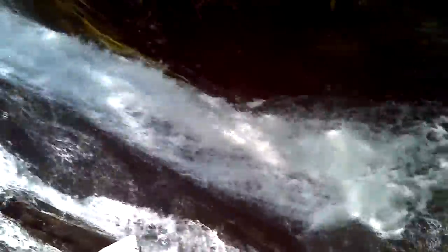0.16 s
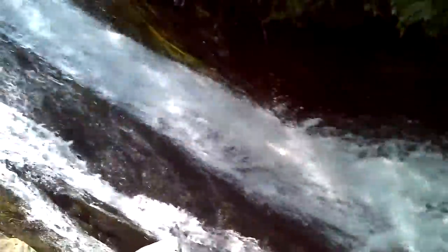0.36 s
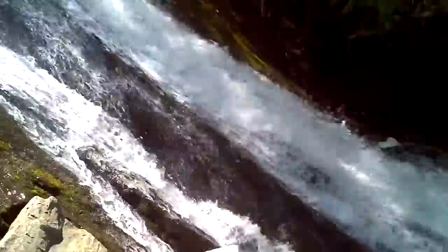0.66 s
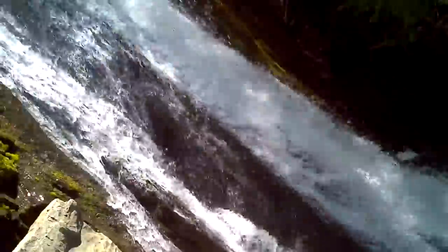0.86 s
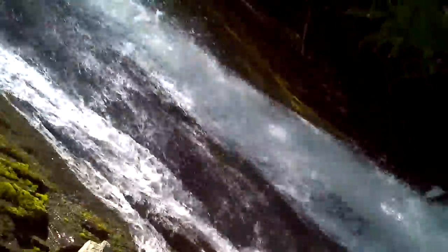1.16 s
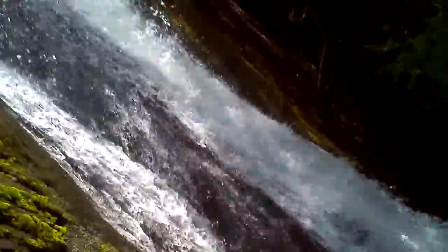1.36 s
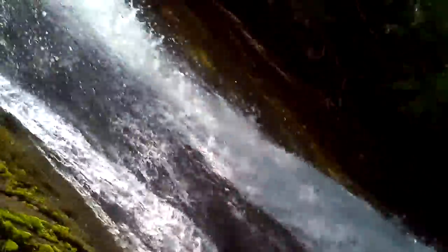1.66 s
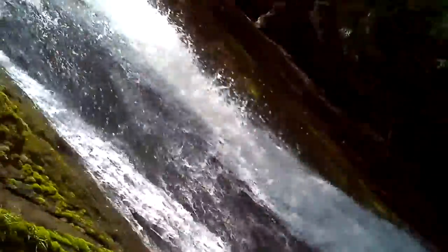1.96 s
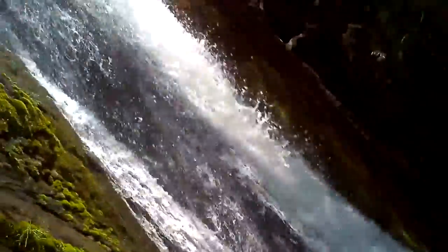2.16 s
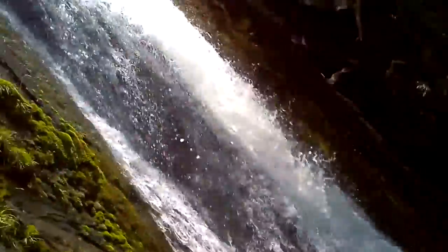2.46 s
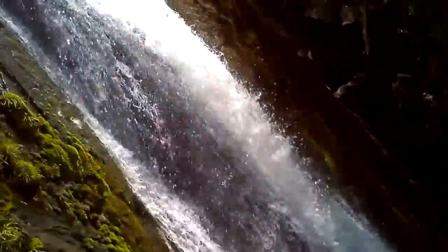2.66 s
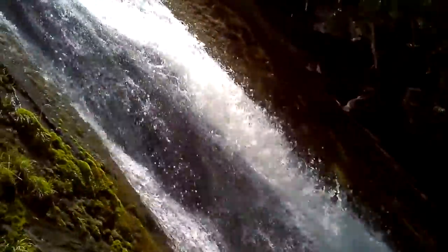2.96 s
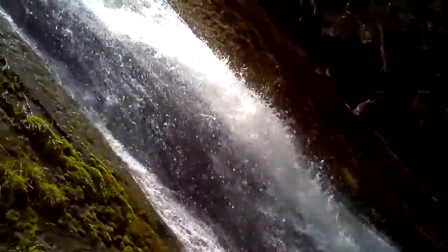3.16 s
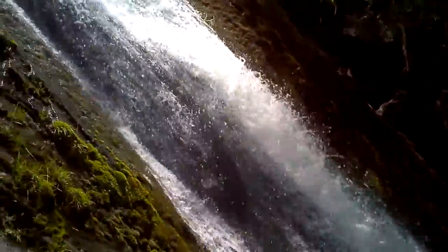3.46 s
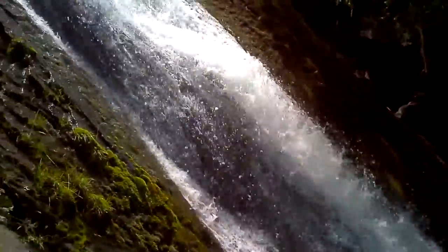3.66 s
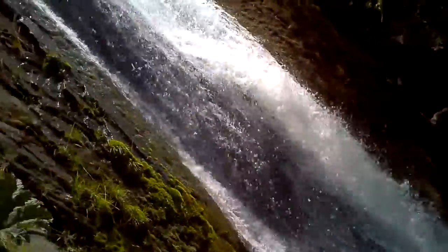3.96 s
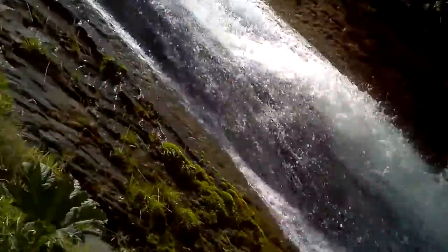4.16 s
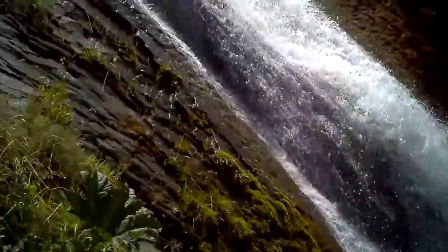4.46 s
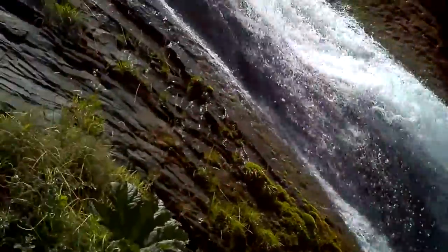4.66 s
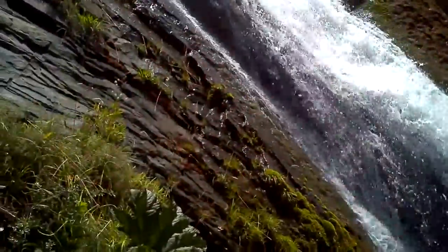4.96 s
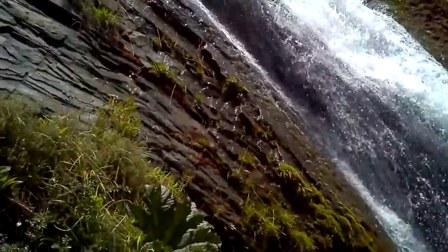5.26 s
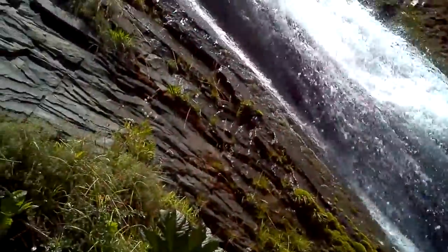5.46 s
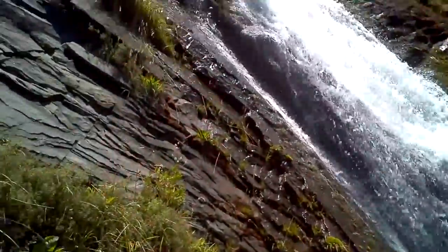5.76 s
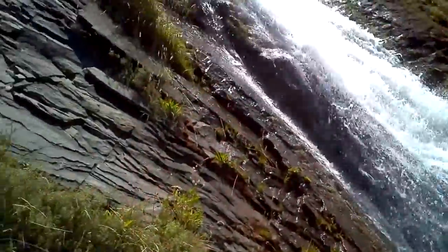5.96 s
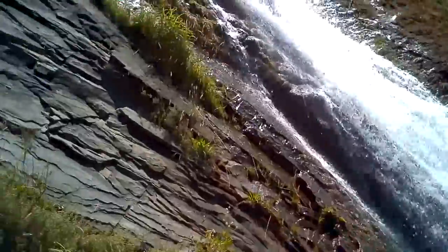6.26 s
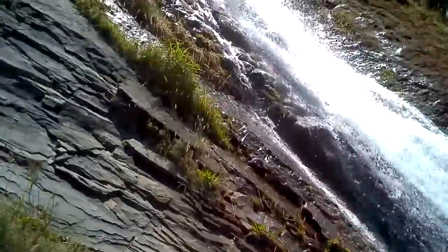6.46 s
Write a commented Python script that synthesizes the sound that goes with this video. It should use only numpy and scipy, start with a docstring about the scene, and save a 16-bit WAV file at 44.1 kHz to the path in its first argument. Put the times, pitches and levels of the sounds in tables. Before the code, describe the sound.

Steady, bright roar of white water racing over stone, with pattering droplets, wet slaps, and light wind-like thumps at the start.

```python
"""Waterfall on rock slabs.

A waterfall close by, as shaped noise and damped rings: the pool churns, a chute gargles, the sheet rushes
with bursting bubbles, spray hisses and patters, slaps hit the stone and air pockets gulp. Its draught
puffs on two microphone ports, as low noise under swells. The camera widens the ports into stereo by
cross-subtraction. Twice the sound cuts out for an instant."""
import sys
import numpy as np
from scipy import signal
from scipy.fft import rfft, irfft, next_fast_len
from scipy.io import wavfile
from scipy.ndimage import uniform_filter1d, map_coordinates

SR = 44100
rng = np.random.default_rng(int(sys.argv[2]) if len(sys.argv) > 2 else 0)


def output_pcm(signal):
    """Save a mono or channel-first signal as 16-bit PCM at the path in sys.argv[1].

    Samples are clipped to [-1, 1] before scaling.
    """
    pcm = np.clip(np.atleast_2d(signal).T, -1, 1) * 32767
    wavfile.write(sys.argv[1], SR, np.round(pcm).astype(np.int16))


N = 291501

# spectrum shape of droplets on rock: hz, relative_db_per_hz
SPRAY_SPECTRUM = [(3000, -30.5), (5200, -17.5), (6000, -6), (6550, 0.15), (7400, -0.5), (8200, 0.5),
                  (8900, 0.5), (9600, -4.5), (10400, -5), (11000, -8.5)]


def amp(db):
    """Decibels to gain."""
    return 10 ** (np.asarray(db) / 20)


def unit(x):
    """Scale to rms 1."""
    return x / np.sqrt(np.mean(x ** 2) + 1e-20)


def along(points, hz):
    """Read (Hz, value) points on a log frequency axis."""
    point_hz, value = np.transpose(points)
    return np.interp(np.log(hz + 1), np.log(point_hz + 1), value)


def curves(rows):
    """One value per sample for each column after the time."""
    time_s, *columns = np.transpose(rows)
    return [np.interp(np.arange(N) / SR, time_s, column) for column in columns]


def wobble(knots_per_s):
    """Smooth random curve through normally distributed knots."""
    knots = rng.standard_normal(2048)
    return map_coordinates(knots, [np.arange(N) * knots_per_s / SR], mode="wrap")


def hump(centre_s, length_s):
    """Smooth swell of height 1, half as high at the ends of its length."""
    offset_s = np.arange(N) / SR - centre_s
    return np.exp(-np.log(2) * (2 * offset_s / length_s) ** 2)


def filtered(x, response):
    """Multiply the spectrum of x by a response of frequency."""
    size = next_fast_len(N + 8192)
    hz = np.fft.rfftfreq(size, 1 / SR)
    return irfft(rfft(x, size) * response(hz), size)[..., :N]


def churn(patchy_db):
    """Two unrelated noises whose loudness shifts in common patches of time and pitch."""
    spectra = signal.stft(rng.standard_normal((2, N)), nperseg=512)[2]
    field = rng.standard_normal(spectra.shape[1:])
    field = uniform_filter1d(field, size=6, axis=0)  # bins
    field = uniform_filter1d(field, size=12, axis=1)  # frames
    patchy = spectra * amp(patchy_db * unit(field))
    return unit(signal.istft(patchy, nperseg=512)[1][:, :N])


def grains(count, low_hz, high_hz, decay_cycles, spread_db, rise, ring_samples):
    """Two unrelated showers of damped rings, climbing in pitch for two decay times like surfacing bubbles."""
    when, pitch, strength, lane = rng.random((count, 4)).T[:, :, None]
    hz = low_hz * (high_hz / low_hz) ** pitch
    cycles = hz * np.arange(ring_samples) / SR
    age = cycles / decay_cycles
    tone = np.sin(2 * np.pi * cycles * (1 + rise * np.minimum(age, 2) / 2))
    ring = tone * np.exp(-age) * (1 - np.exp(-2 * cycles))
    # exponential spread of levels in dB
    gain = amp(-spread_db * np.log(1 - strength * .97))
    at = (when * N).astype(int) + np.arange(ring_samples)
    slots = at % N + N * (lane > .5)
    return unit(np.bincount(slots.ravel(), (gain * ring).ravel(), 2 * N).reshape(2, N))


def splashes(count, life_s):
    """Sudden random rises that decay exponentially, as a curve of mean 0 and rms 1."""
    when, size = rng.random((count, 2)).T
    hits = np.bincount((when * N).astype(int), size ** 2, N)
    decay = np.exp(-1 / (life_s * SR))
    return unit(signal.lfilter([1], [1, -decay], hits - hits.mean()))


def at_ports(pair, spectrum):
    """Colour two unrelated signals and mix them to the ports' likeness, rms 1."""
    # likeness of the ports, high for long waves: hz, correlation (-1 to 1)
    likeness = [(200, 0.94), (420, 0.98), (550, 0.75), (800, 0.93), (1200, 0.46), (1750, 0.13),
                (2100, -0.24), (2480, 0.35), (2760, -0.75), (3120, -0.011), (3420, -0.25), (4000, 0.15),
                (7300, -0.054), (8800, 0.18), (11000, 0.0069)]

    def mid_side(hz):
        angle = np.arccos(np.clip(along(likeness, hz), -.99, .99)) / 2
        return amp(along(spectrum, hz)) * np.array([np.cos(angle), np.sin(angle)])

    mid, side = filtered(pair, mid_side)
    return unit(np.array([mid + side, mid - side]))


def pool(level_db):
    """Air driven under by the fall rings as large bubbles inside a faintly heaving roar."""
    # hz, relative_db_per_hz
    pool_spectrum = [(60, -49), (140, -42), (200, -25), (250, -13), (310, -1.5), (430, 3.5), (530, 0),
                     (700, -14.5), (1200, -20), (4000, -76)]
    heave_db, heave_knots_per_s = -0.1, 30
    bubbles = grains(count=1400, low_hz=233.8, high_hz=596, decay_cycles=6.7,
                     spread_db=-2.0, rise=0.074, ring_samples=2400)
    water = at_ports(churn(patchy_db=2.0) + amp(-14.0) * bubbles, pool_spectrum)
    return amp(level_db + heave_db * wobble(heave_knots_per_s)) * water


def chute(level_db):
    """Water in a narrow rock channel gargles with a hollow note, louder in each surge."""
    # hz, relative_db_per_hz
    chute_spectrum = [(300, -30), (520, 0.5), (600, 2), (700, 4), (820, 0.5), (1050, -14), (2500, -60)]
    # surges: centre_s, gain_db, length_s
    surge_rows = [(2.667, 5, .12), (4.63, 3.5, 0.13), (5.178, 6.5, 0.092), (5.856, 3.5, 0.054)]
    bubbles = grains(count=2400, low_hz=551.7, high_hz=1002, decay_cycles=10.7,
                     spread_db=0.5, rise=0.097, ring_samples=1600)
    water = at_ports(churn(patchy_db=3.3) + amp(-15.5) * bubbles, chute_spectrum)
    surge_db = sum(gain_db * hump(centre_s, length_s) for centre_s, gain_db, length_s in surge_rows)
    return amp(level_db + surge_db) * water


def sheet(level_db):
    """White water races over the slabs, full of small bursting bubbles."""
    # hz, relative_db_per_hz
    sheet_spectrum = [(250, -36), (620, -7.5), (950, -1.5), (1500, -0.64), (2100, 2.54), (2500, -0.5),
                      (2760, -2.5), (3120, -2), (3500, 3.5), (4500, -2), (5300, -1.5), (6500, -2),
                      (11000, -31)]
    bubbles = grains(count=14000, low_hz=791.0, high_hz=5070, decay_cycles=4.47,
                     spread_db=1.0, rise=0.1, ring_samples=500)
    water = at_ports(churn(patchy_db=1.91) + amp(-14) * bubbles, sheet_spectrum)
    return amp(level_db + 0.19 * splashes(count=900, life_s=0.0032)) * water


def spray(level_db):
    """Droplets tick on wet rock in flurries and splashes, over the hiss of the mist."""
    drops = grains(count=24000, low_hz=4720, high_hz=11170, decay_cycles=3.3,
                   spread_db=1.5, rise=0.043, ring_samples=96)
    water = at_ports(churn(patchy_db=1.04) + amp(-13.5) * drops, SPRAY_SPECTRUM)
    flurry_db = 0.3 * wobble(knots_per_s=33) + 0.75 * splashes(count=550, life_s=0.011)
    return amp(level_db + flurry_db) * water


def gulps(life_s, rise_per_s, gurgle_count):
    """Surfacing air pockets swell, ring for a few cycles and climb in pitch."""
    # large pockets, level and pitch at the peak of the swell: start_s, level_db, pitch_hz
    large_pockets = [(.925, -30, 210), (1.378, -34, 208), (2.144, -30.5, 207), (2.442, -31, 169),
                     (2.779, -30, 207), (3.156, -28.5, 208), (3.811, -33, 202), (4.217, -32, 212),
                     (4.516, -32, 198), (5.104, -33, 212), (5.494, -34, 204), (5.635, -33, 165),
                     (6.553, -27, 134)]
    gurgle_db, gurgle_scatter_db, gurgle_low_hz, gurgle_high_hz = -32.5, -1.5, 229, 346.5
    pockets = list(large_pockets)
    # smaller pockets gurgle all the time
    for k, (late, loud, pitch) in enumerate(rng.random((gurgle_count, 3))):
        start_s = (k + 2 * late) / gurgle_count * N / SR
        level_db = gurgle_db + gurgle_scatter_db * (2 * loud - 1)
        pockets.append((start_s, level_db, gurgle_low_hz + pitch * (gurgle_high_hz - gurgle_low_hz)))
    out = np.zeros(N + SR)
    t = np.arange(SR // 8) / SR
    swell = (t / life_s) ** 2 * np.exp(2 - 2 * t / life_s)
    bent_t = t * (1 + rise_per_s * (t - 2 * life_s))
    for start_s, level_db, pitch_hz in pockets:
        out[round(start_s * SR):][:len(t)] += amp(level_db) * swell * np.sin(2 * np.pi * pitch_hz * bent_t)
    return out[:N]


def draught():
    """Air dragged along by the fall flutters on each port separately; each puff thumps mainly on one."""
    # hz, relative_db_per_hz
    draught_spectrum = [(20, 9), (60, -6), (100, 4), (135, 7), (200, 3.5), (300, -6.5), (500, -8.5),
                        (1500, -51)]
    # the air stirs at first, then calms: time_s, level_db
    breeze_rows = [(0, -39), (.21, -62), (.3, -46), (.9, -46), (1.02, -57), (1.5, -47), (1.62, -80),
                   (6.6, -77)]
    # strongest puffs, level before the low cut: centre_s, level_db, length_s
    puff_rows = [(0.066, -21.5, 0.043), (0.12, -25.5, 0.028), (0.16, -31, .014), (0.272, -32, 0.042),
                 (0.351, -30, 0.025), (0.435, -32, 0.022), (0.557, -44, 0.024), (0.65, -23.5, 0.032),
                 (0.749, -22.5, 0.041), (0.843, -21, 0.032), (0.914, -34, 0.04), (1.178, -24, .017),
                 (1.212, -35, 0.022), (1.308, -30.5, 0.034), (1.468, -36, 0.05), (1.831, -24, 0.02),
                 (2.02, -42, 0.019), (3.47, -42, 0.068), (4.056, -46, 0.018), (4.104, -35, 0.019),
                 (6.583, -36, 0.065)]
    gust_db, gust_knots_per_s = 6.5, 52
    puff_shared = 0.042  # share reaching the other port, 0-1
    port_low_hz = 55.3  # the ports shed the deepest part of the air's push
    breeze_db, = curves(breeze_rows)
    noise = rng.standard_normal((2, N))
    eddies = unit(filtered(noise, lambda hz: amp(along(draught_spectrum, hz))))
    air = amp(breeze_db + gust_db * wobble(gust_knots_per_s)) * eddies
    puff_ports = rng.integers(2, size=len(puff_rows))
    for (centre_s, level_db, length_s), port in zip(puff_rows, puff_ports):
        push = hump(centre_s, length_s)
        reach = np.where(np.arange(2) == port, 1, puff_shared)[:, None]
        push_rms = np.sqrt(np.mean(push ** 2))
        air += amp(level_db) * unit(reach * push * eddies[port]) * push_rms
    return filtered(air, lambda hz: hz ** 2 / np.sqrt(hz ** 4 + port_low_hz ** 4))


def slaps():
    """Lumps of water burst on the nearest rock, each in a short flurry of droplets."""
    # start_s, level_db (before the attack and decay)
    slap_rows = [(.061, -17), (.083, -23), (.283, -18), (.633, -16.5), (1.077, -22), (1.566, -23),
                 (2.828, -19), (2.932, -26), (3.231, -17.5), (3.918, -23), (5.021, -25), (5.103, -23),
                 (5.386, -21), (6.036, -27), (6.483, -21)]
    attack_s, decay_s = .001, .012
    level = np.zeros(N)
    for start_s, level_db in slap_rows:
        age_s = np.maximum(np.arange(N) / SR - start_s, 0)
        level += amp(level_db) * (1 - np.exp(-age_s / attack_s)) * np.exp(-age_s / decay_s)
    drops = grains(count=48000, low_hz=3500, high_hz=11000, decay_cycles=3.5,
                   spread_db=0.5, rise=0.04, ring_samples=96)
    return level * at_ports(drops, SPRAY_SPECTRUM)


def scene():
    """All the water and its draught at the two ports."""
    # the microphone turns from the pool up to the chute: time_s, pool_db, chute_db, sheet_db, spray_db
    aim_rows = [(0, -34.5, -43.5, -26, -20.5), (.35, -35, -44.5, -26.5, -20.5),
                (1.3, -34.5, -42, -26.5, -21.5), (2.2, -36.5, -41, -26.5, -21),
                (2.8, -35.5, -38, -26, -20.5), (3.6, -34.5, -37.5, -26, -20), (4.3, -35, -36.5, -26.5, -21),
                (5.2, -35.5, -38.5, -26, -20.5), (6.1, -35.5, -37, -27, -21.5), (6.6, -35.5, -37, -27, -22)]
    pool_db, chute_db, sheet_db, spray_db = curves(aim_rows)
    water = pool(pool_db) + chute(chute_db) + sheet(sheet_db) + spray(spray_db)
    water = water + gulps(life_s=0.011, rise_per_s=1.0, gurgle_count=110)
    return water + draught() + slaps()


def widened(ports):
    """Each channel subtracts the delayed opposite port, which combs middle and sides in turn."""
    # how much of the opposite port is subtracted: hz, share (0-1)
    widening = [(100, .82), (1500, .74), (2900, .97), (4500, .82), (5900, .74), (7300, .58), (8800, .64),
                (10300, .66)]
    port_lag_s = .000341  # set by the port spacing

    def share(hz):
        return np.clip(along(widening, hz), 0, .98)

    opposite = filtered(ports[::-1], lambda hz: share(hz) * np.exp(-2j * np.pi * hz * port_lag_s))
    return filtered(ports - opposite, lambda hz: 1 / np.sqrt(1 + share(hz) ** 2))


def gaps():
    """Gain that drops abruptly in each gap, holds, fades to near silence, creeps up and snaps back."""
    # start_s
    gap_starts = [1.411, 4.915]
    gap_s, hold_s, drop_db = .0342, .01, 13
    fade_db_per_s, return_db_per_s = 3500, 2800
    age_s = np.arange(N) / SR - np.array(gap_starts)[:, None]
    fading_db = fade_db_per_s * np.maximum(age_s - hold_s, 0)
    returning_db = return_db_per_s * (gap_s - age_s)
    loss_db = drop_db + np.minimum(fading_db, returning_db)
    inside = (age_s > 0) & (age_s < gap_s)
    return amp(-np.sum(loss_db * inside, axis=0))


def record(dry):
    """The camera widens the stereo, cuts out twice and cuts steeply above its band limit."""
    top_hz = 11060
    sound = widened(dry) * gaps()
    return filtered(sound, lambda hz: 1 / np.sqrt(1 + (hz / top_hz) ** 500))


dry = scene()
out = record(dry)
output_pcm(out)
```